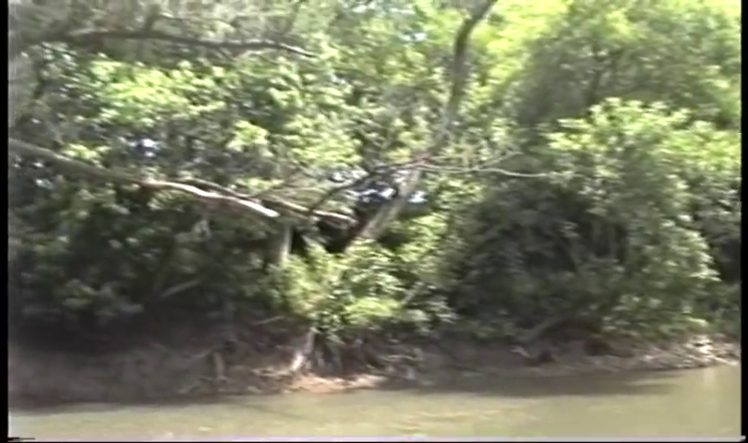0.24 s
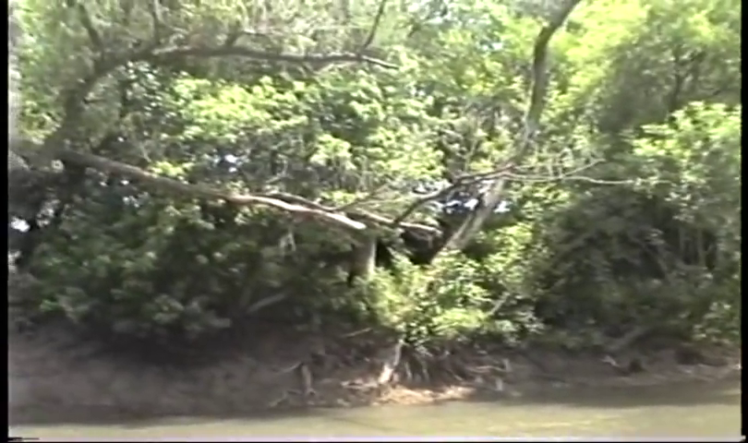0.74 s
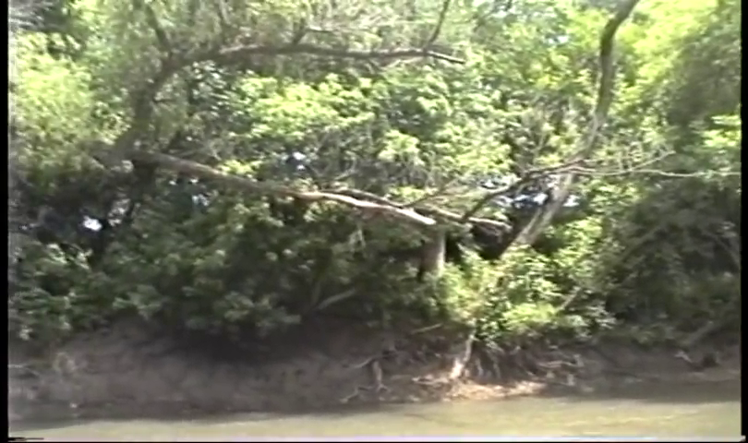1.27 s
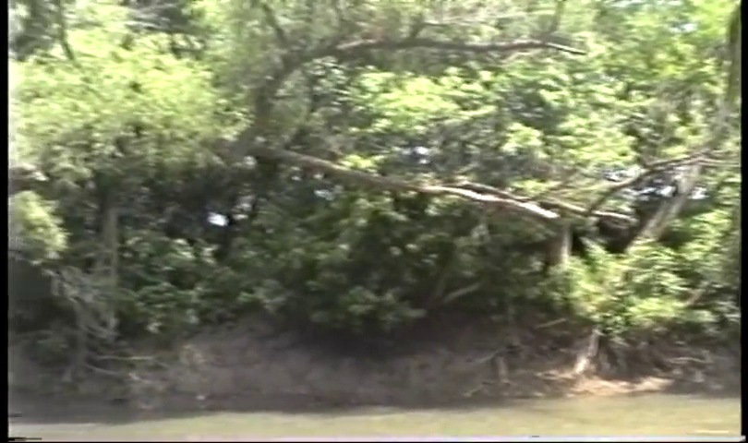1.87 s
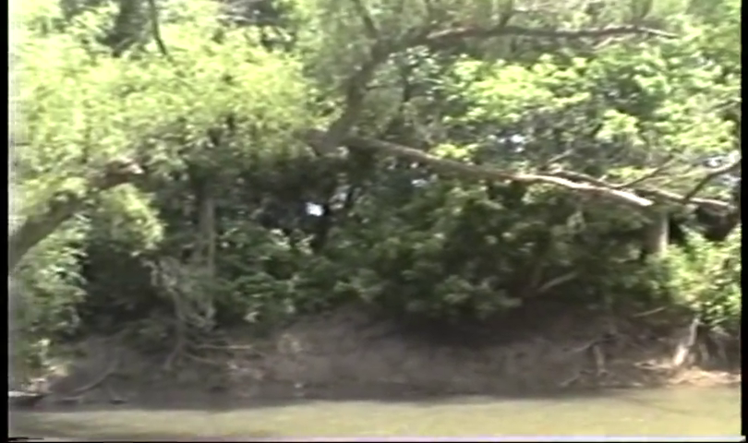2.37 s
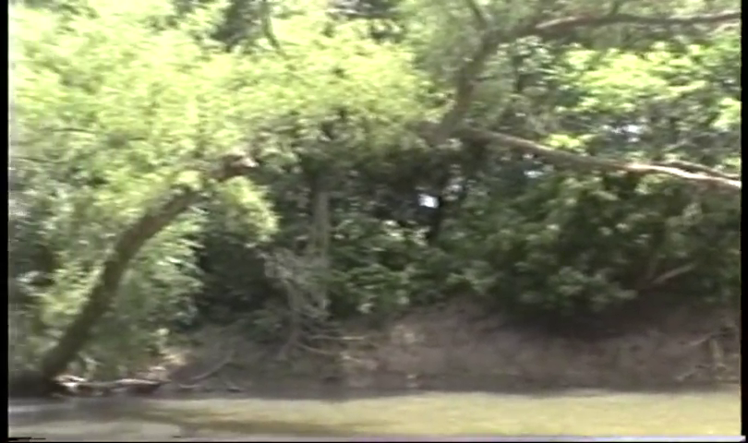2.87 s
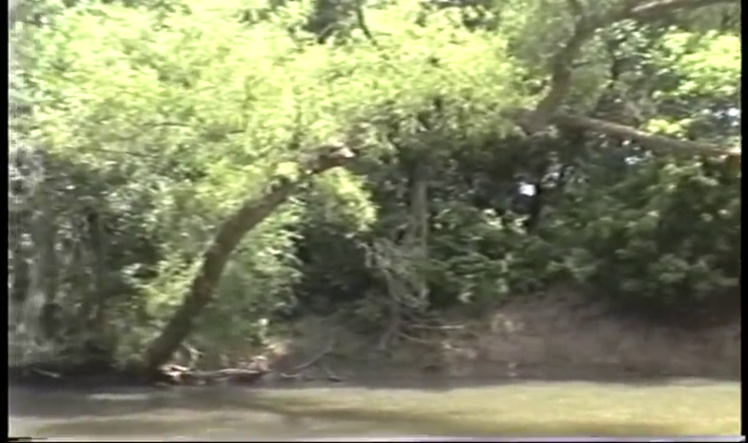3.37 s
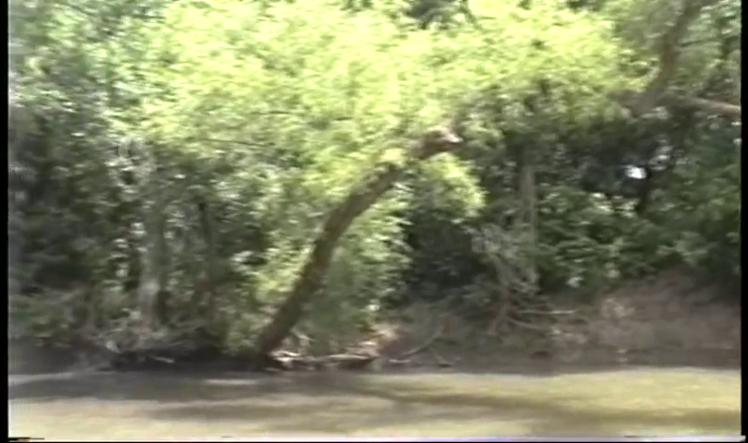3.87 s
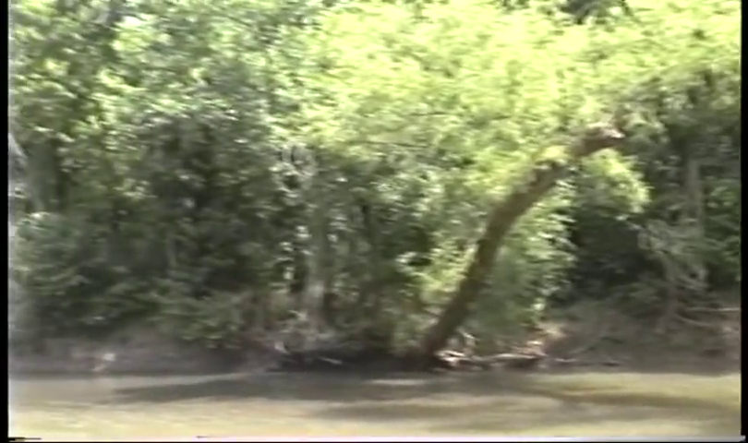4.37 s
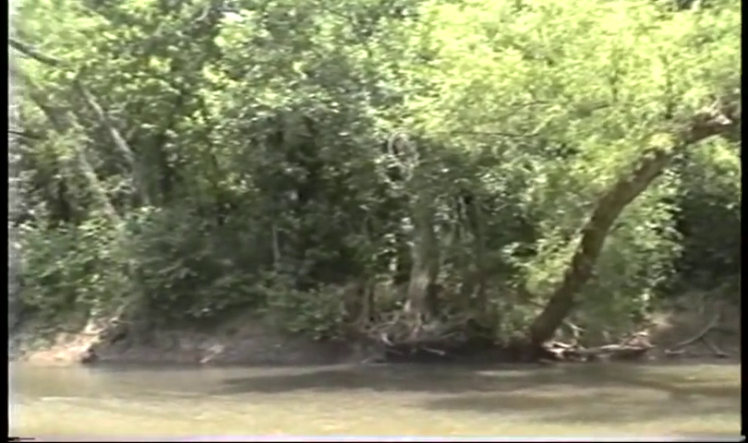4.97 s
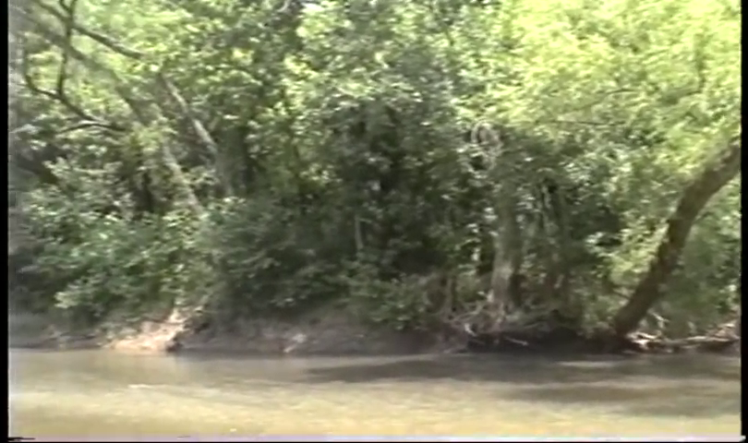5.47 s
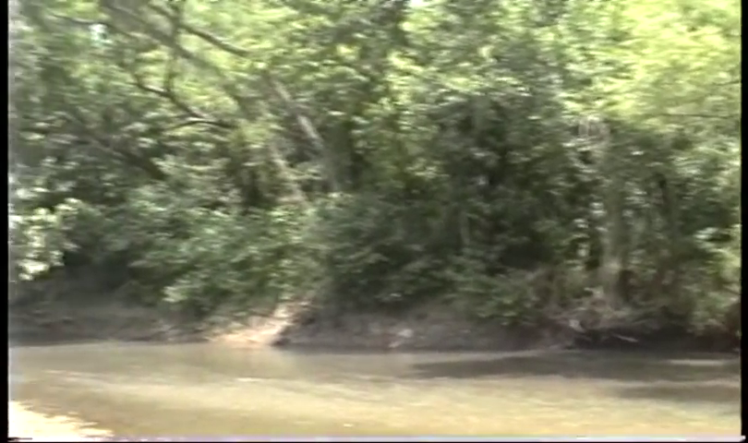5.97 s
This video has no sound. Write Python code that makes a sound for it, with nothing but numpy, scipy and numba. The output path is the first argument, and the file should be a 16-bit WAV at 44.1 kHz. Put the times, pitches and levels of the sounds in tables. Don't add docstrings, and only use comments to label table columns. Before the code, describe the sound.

Loud shrill insect buzzing fills the woods by a river, rising past the middle and falling away, with hissy camera noise and two tiny taps.

```python
import sys
import numpy as np
from scipy import signal
from scipy.fft import rfft, irfft, next_fast_len
from scipy.io import wavfile
from scipy.ndimage import uniform_filter1d
from numba import njit

SR = 44100
rng = np.random.default_rng(int(sys.argv[2]) if len(sys.argv) > 2 else 0)


def bounce(signal):
    frames = np.transpose(np.atleast_2d(signal))
    limited = np.clip(frames, -1, 1)
    pcm = np.round(limited * 32767).astype(np.int16)
    wavfile.write(sys.argv[1], SR, pcm)


def voltage_ratio(level):
    return 10 ** (np.asarray(level, float) / 20)


N = 274743
DRUM_HZ = 30 / 1.001


def shape(x, gain):
    size = 2 * next_fast_len(x.shape[-1] // 2 + 1)
    spectrum = rfft(x, size) * gain(np.fft.rfftfreq(size, 1 / SR))
    return irfft(spectrum, size)[..., :x.shape[-1]]


def level(x, db):
    return x * voltage_ratio(db) / np.sqrt(np.mean(x ** 2, axis=-1, keepdims=True))


def walk(rate):
    hold = int(SR / rate)
    steps = np.repeat(rng.standard_normal(N // hold + 1), hold)
    return 1.3 * uniform_filter1d(uniform_filter1d(steps, hold), hold)[:N]


# f/Hz, level/dB per Hz
SUM_HISS_COLOUR = [(15, -16.5), (40, -6.5), (150, -7.5), (500, -10.5), (800, -13.5), (1400, -18),
                   (2200, -17), (4000, -16), (10000, -20.5), (15000, -27.5), (17000, -43)]
DIFF_HISS_COLOUR = [(15, -11), (40, 5.5), (150, -4), (500, -8), (800, -12.5), (1400, -15.5), (2200, -19.5),
                    (4000, -29.5), (10000, -19), (15000, -23.5), (17000, -40)]


def hiss(colour, db):
    hz, colour_db = np.transpose(colour)

    def gain(f):
        return voltage_ratio(np.interp(np.log(f + 1), np.log(hz), colour_db)) * (f > 12)

    noise = shape(rng.standard_normal(N), gain)
    return level(noise, db) * voltage_ratio(1.2 * walk(32))


# multiple of the drum turn, level/dB rms on the left
DRUM_TEETH = [(1, -47), (2, -47), (3, -57), (4, -65), (8, -60), (14, -67), (15, -65), (16, -63), (17, -62),
              (18, -64), (24, -67), (31, -66), (32, -60), (36, -65)]


def drum():
    comb_top, comb_db, fall_db, scatter_db = 48, -66, 0.17, 2.5
    right_db, line_hz = -7, 15734
    t = np.arange(N) / SR
    start = rng.random(comb_top + 1)
    teeth = {k: comb_db - fall_db * k + scatter_db * rng.standard_normal() for k in range(1, comb_top + 1)}
    teeth.update(dict(DRUM_TEETH))
    buzz = voltage_ratio(-76) * np.sin(2 * np.pi * line_hz * t)
    for k, db in teeth.items():
        buzz = buzz + voltage_ratio(db) * np.sin(2 * np.pi * (k * DRUM_HZ * t + start[k - 1]))
    return np.sqrt(2) * buzz * np.array([[1], [-voltage_ratio(right_db)]])


def head_ticks(db):
    first_s = 0.00987
    turns = np.arange(int(2 * DRUM_HZ * N / SR)) / DRUM_HZ / 2
    at = (SR * (first_s + turns)).astype(int)
    at = at[at < N]
    out = np.zeros(N)
    out[at] = rng.standard_normal(len(at)) * voltage_ratio(db)
    return shape(out, lambda f: f / (f + 300) / np.sqrt(1 + (f / 2500) ** 2))


def grain(track, db):
    loudness = uniform_filter1d(np.abs(track), size=16) ** 2.0
    crackle = loudness * rng.standard_normal(N)
    return level(shape(crackle, lambda f: (f / (f + 900)) ** 2 / (1 + (f / 3000) ** 2)), db)


@njit
def follow(x, attack, release):
    out, e = np.empty(len(x)), 0.
    for i in range(len(x)):
        e += (x[i] - e) * (attack if x[i] > e else release)
        out[i] = e
    return out


def duck(x, top_db, ratio, attack_s, release_s):
    attack = min(1 / (attack_s * SR), 1.)
    release = min(1 / (release_s * SR), 1.)
    envelope = follow(np.abs(x).max(axis=0), attack, release)
    return x * (voltage_ratio(top_db) / np.maximum(envelope, voltage_ratio(top_db))) ** (1 - 1 / max(ratio, 1.))


def bend(track):
    return shape(track ** 2, lambda f: f / (f + 80))


# t/s, peak level/dB, f/Hz
TAPS = [
    (3.005, -30, 1020),
    (5.104, -31, 2600),
]


def tap():
    out = np.zeros(N)
    t = np.arange(300) / SR
    swell = np.sin(np.pi * np.clip(t / 0.0024, 0, 1)) ** 2
    for s, db, hz in TAPS:
        i = int(s * SR)
        out[i:i + 300] += voltage_ratio(db) * np.sin(2 * np.pi * hz * t) * swell
    return out


def crowd(count):
    stroke_hz, spread, duty = 164.77, 0.25, 0.28
    out = np.zeros((2, N))
    for rate, start, place in rng.random((count, 3)):
        hz = stroke_hz * (1 + spread * (2 * rate - 1)) * (1 + .02 * walk(3))
        stroke = (start + np.cumsum(hz) / SR) % 1
        burst = np.exp(-(1 - stroke) / duty)
        ribs = burst * rng.standard_normal(N) * voltage_ratio(1.84 * walk(2.52))
        angle = place * np.pi / 2
        out += ribs * np.array([[np.cos(angle) ** 2], [np.sin(angle) ** 2]])
    return out


def leaves(x):
    t60_s, tail_db = 0.28, 1.5
    t = np.arange(SR // 2) / SR
    fade = np.exp(-np.log(1000) * t / t60_s)
    tail = level(rng.standard_normal((2, len(t))) * fade, tail_db)
    tail[:, 0] = np.sqrt(len(t))
    return shape(x, lambda f: np.exp(1j * np.angle(rfft(tail, 2 * len(f) - 2))))


# t/s, level/dB,
# left minus right/dB
DRONE_SWELL = [(0.0, -25.5, -1.7), (1.0, -25.3, -1.3), (1.6, -24.8, -2.6), (2.3, -23.6, -1.6),
               (2.8, -23.4, -3.6), (3.5, -23, -1.6), (3.9, -22.3, -.8), (4.3, -20.7, .8), (4.9, -20.2, 1.1),
               (5.36, -20.4, .9), (5.44, -23.0, .3), (5.75, -23, -.7), (6.23, -26, -.8)]
# centre f/Hz, spread over the crowd f/Hz, skirt steepness, trim level/dB
RESONANCES = [(6213.5, 466, 2.047, 0.43), (4340, 359, 1.615, -13), (8066, 470, 1.396, -16.5)]
# share of swell, share of left-right drift, own lean to the left level/dB, share of
RESONANCE_FOLLOW = [(1.1, 1.07, -0.1, 0.81), (0.9, 1.05, 1.7, 1.06), (0.82, 0.31, 0.8, 0.73)]


def cicadas():
    mean_db = -23.5
    clicks = leaves(crowd(count=12))
    s, db, left_db = np.transpose(DRONE_SWELL)
    t = np.arange(N) / SR
    swell_db = np.interp(t, s, db - mean_db)
    turn_db = np.interp(t, s, left_db)
    widen = np.clip(0.042 - 0.04 * turn_db, 0, .5)
    out = 0
    for resonance, share in zip(RESONANCES, RESONANCE_FOLLOW):
        hz, spread_hz, steep, trim_db = resonance
        swell, turn, lean_db, wide = share
        pan_db = turn * turn_db + lean_db
        sides_db = np.array([pan_db, -pan_db]) / 2
        widened = clicks - wide * widen * clicks[::-1]
        ring = shape(widened, lambda f: np.exp(-np.abs((f - hz) / spread_hz) ** steep / 4))
        out = out + level(ring, trim_db + 4.0) * voltage_ratio(mean_db + swell * swell_db + sides_db)
    return out


def scene():
    return tap() + cicadas()


def top_cut(x):
    return signal.sosfilt(signal.butter(12, 15660, fs=SR, output="sos"), x)


def record(dry):
    left, right = duck(dry, top_db=-14, ratio=2.5, attack_s=.0002, release_s=.004)
    mid, side = (left + right) / 2, (left - right) / 2
    mid_noise = hiss(SUM_HISS_COLOUR, -48) + head_ticks(-26) + grain(mid, -54)
    side_noise = hiss(DIFF_HISS_COLOUR, -45) + head_ticks(-25) + grain(side, -51)
    mid = np.tanh(2.082 * mid) / 2.104 + .08 * bend(mid) + mid_noise
    side = np.tanh(2.35 * side) / 1.94 - 0.18 * bend(side) + side_noise
    lean = shape(side, lambda f: 0.19 / (1 + (f / 2500) ** 4))
    channels = np.array([mid + side + lean, mid - side + lean])
    tape = shape(channels, lambda f: 1 / np.sqrt(1 + (f / 15100) ** 60))
    return top_cut(tape + drum())


dry = scene()
out = record(dry)
bounce(out)
```